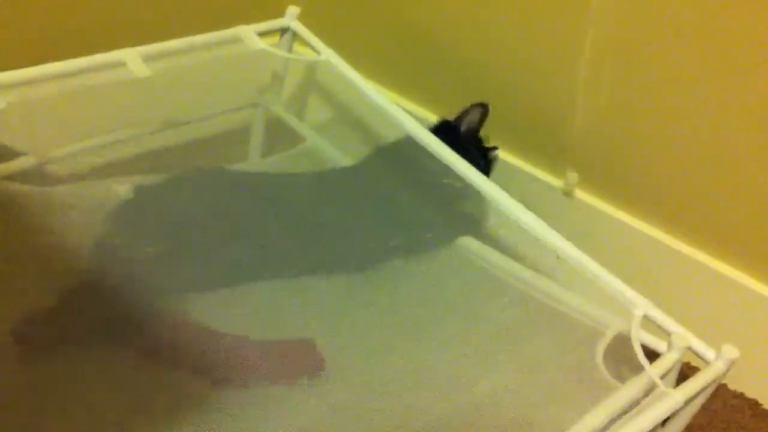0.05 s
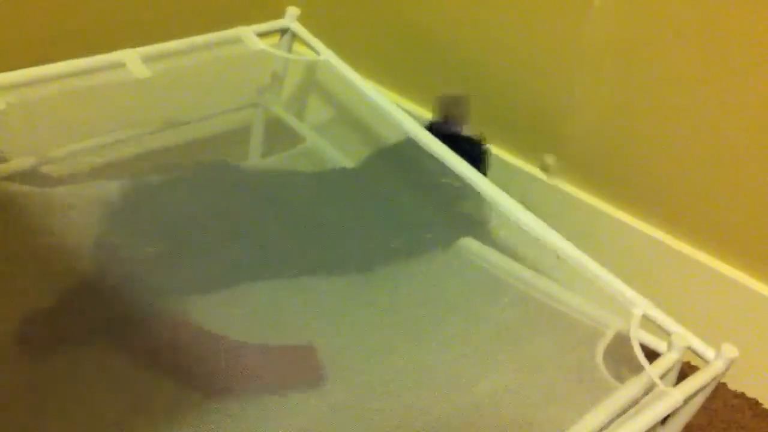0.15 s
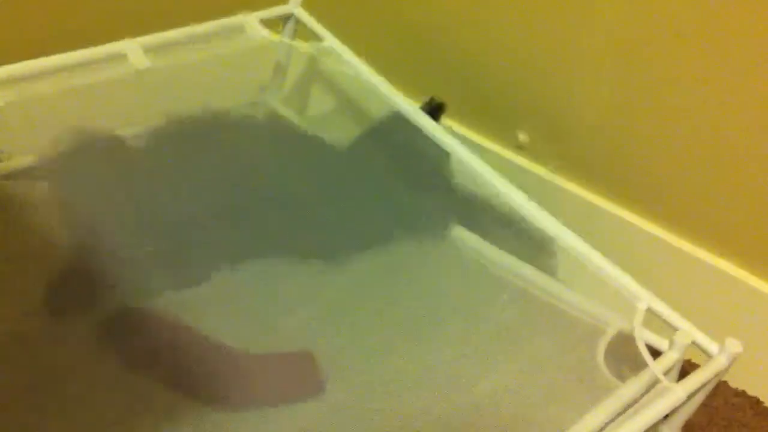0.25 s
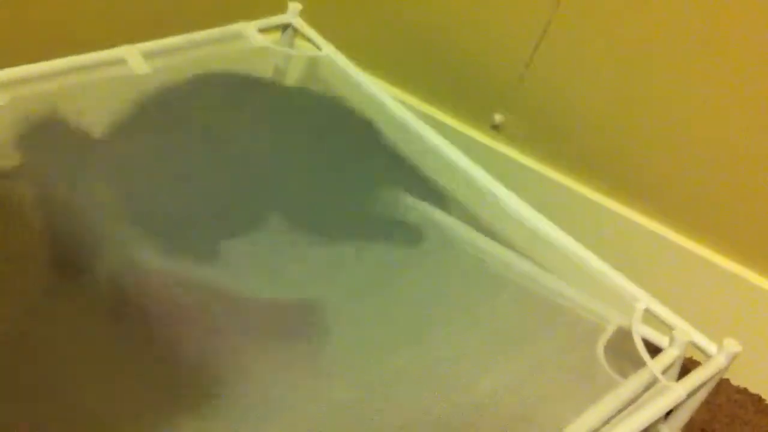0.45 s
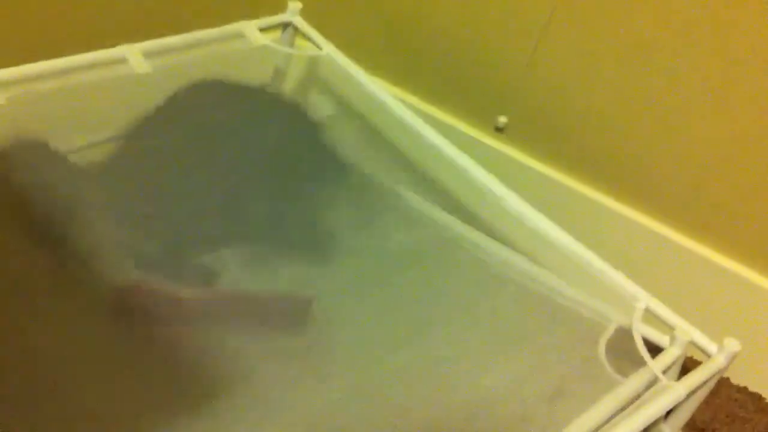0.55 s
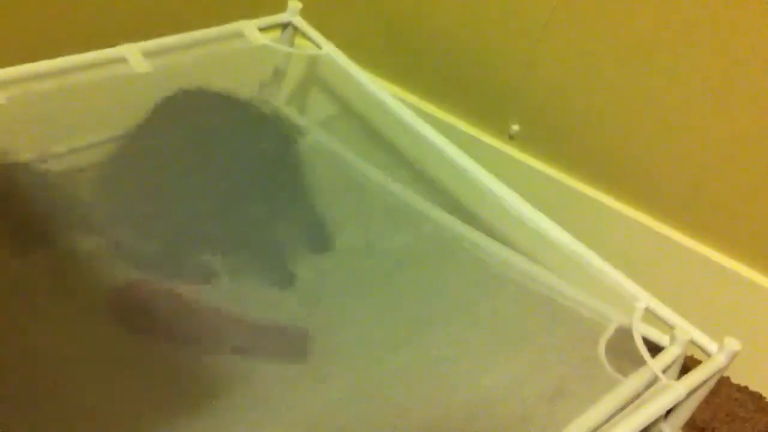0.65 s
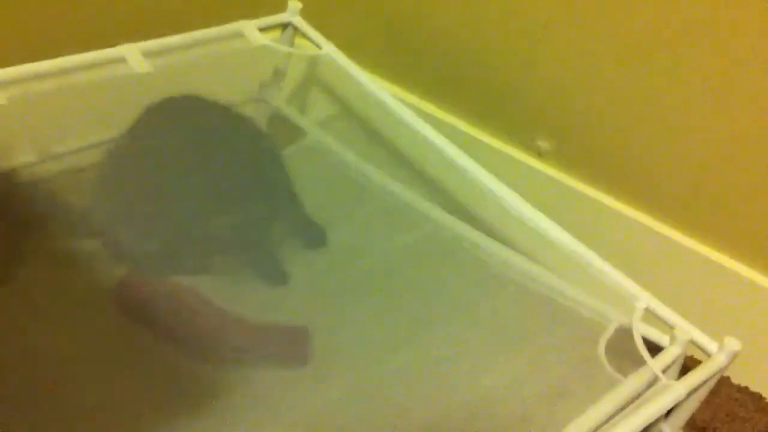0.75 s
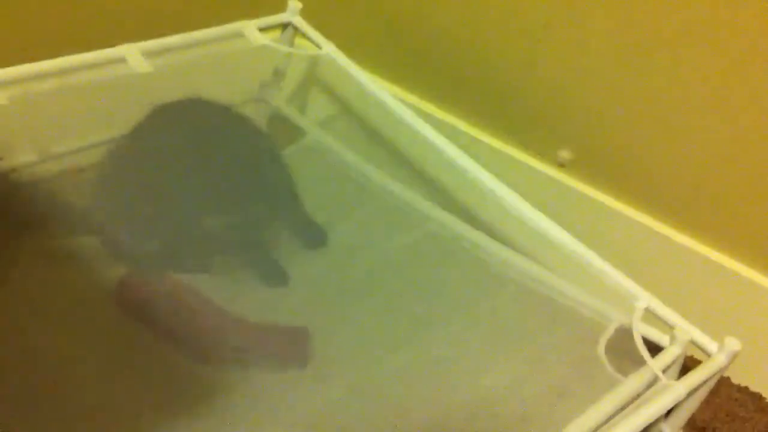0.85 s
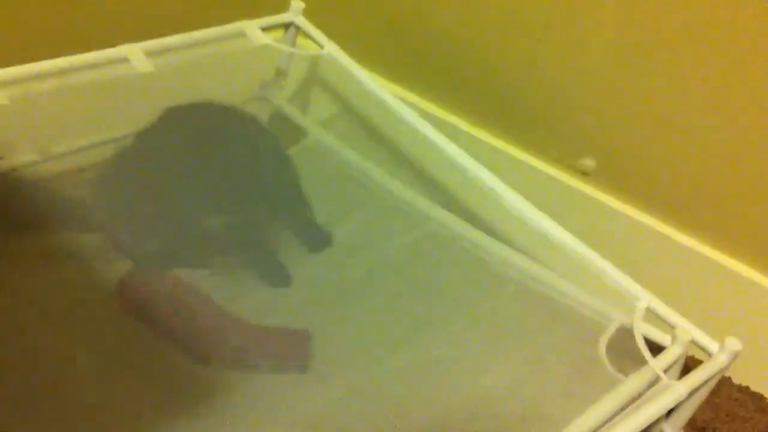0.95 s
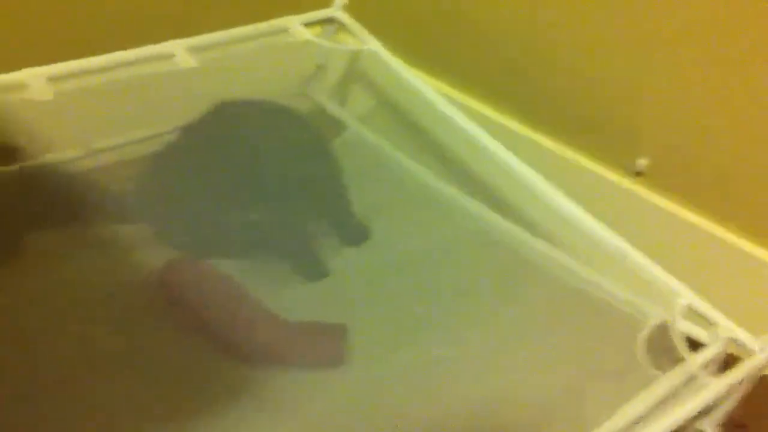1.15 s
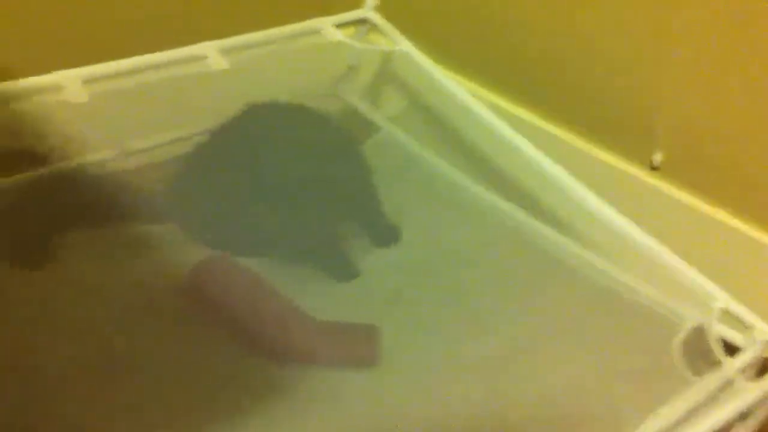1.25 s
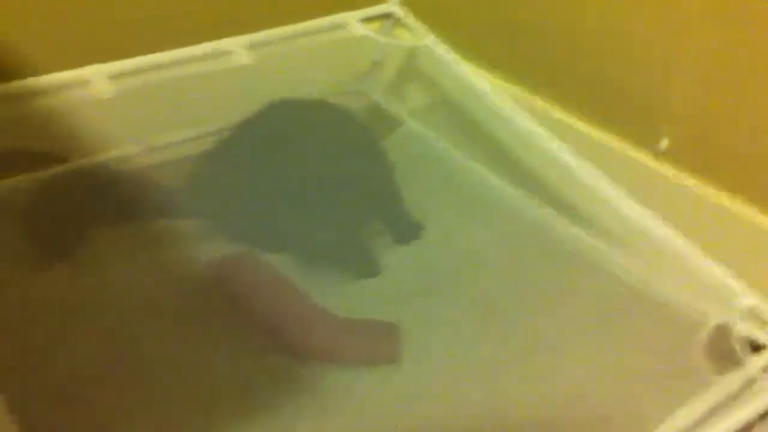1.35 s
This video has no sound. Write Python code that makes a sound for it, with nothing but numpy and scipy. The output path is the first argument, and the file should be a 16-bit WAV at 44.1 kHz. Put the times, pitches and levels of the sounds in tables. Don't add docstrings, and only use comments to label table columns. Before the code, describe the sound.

Sharp plastic knocks from a drying rack jostled by a kitten, building to one hard, briefly ringing crack, then sparse light ticks and soft handling bumps; small room, close hand-held microphone, steady faint hiss.

```python
import sys
import numpy as np
from scipy import signal
from scipy.fft import rfft, irfft
from scipy.io import wavfile
from scipy.ndimage import uniform_filter1d

SR = 44100
rng = np.random.default_rng(int(sys.argv[2]) if len(sys.argv) > 2 else 0)


def wav_record(signal):
    frames = np.transpose(np.atleast_2d(signal))
    bounded = np.clip(frames, -1, 1)
    quanta = np.round(bounded * 32767).astype(np.int16)
    wavfile.write(sys.argv[1], SR, quanta)


def volts_from_decibels(level):
    exponent = np.asarray(level, float) / 20
    return 10 ** exponent


N = 61739

# t/s, peak level/dB, lowest f/Hz, highest f/Hz,
# chatter length/ms
JOINT_TICKS = [(0.1985, -48, 4970, 8000, 2.4), (0.1985, -49, 595, 3100, 2.2), (.2132, -42, 500, 1500, 1.2),
               (0.2137, -41, 1600, 4200, 1.2), (0.3055, -39, 1500, 13600, 5), (.3107, -32, 3500, 9000, .8),
               (0.3105, -40, 6560, 14600, 2.5), (.311, -29, 1500, 5000, 3.2), (0.4016, -49, 500, 1800, 4),
               (0.3983, -44, 1290, 3900, 1.7), (0.4387, -48.5, 980, 5900, 11), (0.4445, -32, 700, 11400, 2),
               (.4558, -21, 3000, 6300, 2), (.4558, -25, 1500, 3600, 1.8), (0.455, -30, 6000, 14300, 2.7),
               (0.4579, -42, 600, 1300, 6), (0.4642, -28, 3900, 5200, 2.5), (0.4685, -33, 3800, 5200, 2.5),
               (.4745, -36, 2600, 5600, 3.5),
               (.042, -51, 2180, 12700, 13), (.153, -52, 500, 3300, 1.1), (.282, -45, 590, 2400, 3.3),
         (0.2861, -49.5, 4000, 7500, 2.5), (0.292, -63, 2000, 5500, 2), (0.374, -48, 1500, 8900, 2.8),
         (.384, -42, 1500, 3960, 3.3), (.611, -55, 590, 4000, 2.6), (0.7011, -43, 500, 2750, 3.4),
         (0.7122, -46.5, 690, 4500, 3), (.720, -51, 400, 3200, 5.4), (.835, -53.5, 590, 3520, 4.1),
         (0.877, -40, 2470, 14000, 2.16), (.8775, -48.5, 500, 2520, 1.4), (0.8893, -50, 2000, 6000, 1.05),
         (0.894, -43.5, 1690, 4180, 4.5), (0.949, -43.5, 1190, 4380, 3.5), (1.059, -51, 1500, 3100, 2.4),
         (1.058, -50.5, 694, 5800, 3.6), (1.296, -50.5, 990, 3400, 3), (1.297, -51, 5080, 5760, 2.2),
         (1.306, -55.5, 1000, 2950, 4.7), (1.3378, -50.5, 607, 4470, 1.5), (1.35, -51, 1430, 3280, 4.4),
         (.3155, -40.5, 790, 4130, 10), (.448, -43.5, 1500, 4000, 2.6)]
# t/s, peak level/dB, f/Hz, t60/ms
PINGS = [(.1535, -55, 1500, 8), (.1535, -51, 1020, 8.3), (.2135, -42.5, 835, 17),
         (.2135, -38.5, 1103, 15.5), (.2134, -45.5, 2060, 15), (.2136, -47, 3030, 20),
         (0.31, -32.5, 5700, 8.2), (.3122, -33, 4000, 10), (.311, -36, 3350, 6.7), (0.63, -51, 1500, 8),
         (.7125, -49, 3650, 6), (.7012, -51.5, 810, 11), (.489, -45, 5400, 8.6), (.4985, -51, 3660, 8),
         (0.55, -45, 5000, 8), (.345, -48, 2830, 10), (0.3, -47, 3000, 10), (.3112, -39, 2036, 14),
         (.3126, -28.5, 2780, 6.4), (.319, -49, 2000, 11), (.3335, -42, 1870, 17), (.339, -48, 4300, 13),
         (0.4, -42, 940, 20), (.3985, -33, 1510, 4.1), (.3996, -31.5, 1480, 3.5), (.3986, -46, 2100, 16),
         (.413, -47, 1900, 10), (.445, -34, 4700, 8.8), (0.46, -22, 4500, 14), (.4598, -31, 2950, 7),
         (0.41, -41, 2600, 6), (0.46, -52, 4400, 5.4), (.4562, -33, 1860, 14), (.457, -41, 920, 26),
         (.476, -44, 5400, 8), (.949, -51.5, 3800, 8.6), (1.0575, -48.5, 2660, 13), (1.0575, -58, 1700, 19),
         (1.0575, -56, 2350, 20), (1.0575, -59, 1120, 22), (1.2965, -52, 2250, 16), (1.2965, -57, 1700, 18)]
# t/s, peak level/dB, f/Hz, t60/s, swell/cycles
THUMPS = [(0.1517, -36, 309, 0.036, 1.06), (0.1685, -34, 188, 0.042, 0.73), (0.193, -44.5, 230, 0.043, .6),
          (0.2007, -33, 220.7, 0.087, 0.74), (.201, -43, 335, .08, 0.41), (0.2284, -41, 336, 0.076, 1.2),
          (0.2323, -41, 194, 0.1, 1.1), (.266, -45, 260, 0.047, 0.65), (0.282, -49, 345, 0.052, 0.29),
          (0.4027, -35, 297, 0.032, 0.65), (0.4026, -42.5, 202, 0.036, 0.68), (0.417, -37, 260, 0.038, 1),
          (.4501, -31, 338, 0.042, 0.91), (0.4576, -23.5, 215, 0.095, 0.73),
          (0.4582, -33.5, 340, 0.091, 0.51), (0.456, -43, 136, 0.093, 0.45), (.462, -46, 453, 0.086, 0.21),
          (.458, -47, 634, 0.13, 0.45), (0.4826, -31.5, 340, 0.067, 0.93), (0.4943, -34.5, 192, 0.067, 0.4),
          (.520, -42, 258, 0.072, 0.8), (.525, -48, 176, .06, .8), (0.541, -46, 312, 0.04, 0.52),
          (.55, -51, 237, 0.056, 0.51), (0.574, -42, 212, 0.056, 0.4), (0.601, -46.5, 235, 0.048, 0.45),
          (.703, -57, 280, 0.053, .8), (0.877, -53.5, 309, 0.065, 0.58), (.915, -59, 178, 0.14, .8),
          (1.059, -59.5, 305, 0.09, 0.65)]
# t/s, level/dB
ROD_HITS = [
    (0.4571, -59),
    (0.4652, -66),
    (0.47, -68),
    (0.477, -73),
    (0.483, -73),
    (0.4951, -74),
    (.504, -71),
    (0.513, -67),
]
# t/s, level/dB
LOAD = [(0, -67), (0.061, -67), (.09, -72), (.14, -63.5), (.22, -63.5), (.3, -59.5), (.44, -56), (.55, -62),
        (.75, -68.5), (1.15, -82), (1.4, -72)]
# f/Hz, level/dB
MESH_SPECTRUM = [(300, 1.5), (1000, -5), (2500, -5.5), (5000, -7.5), (10000, -15), (15000, -22.5)]
# t/s, peak level/dB, start f/Hz
BUMPS = [(1.156, -62, 710), (1.185, -51, 560), (1.1983, -53, 695), (1.216, -45, 298), (1.234, -48, 354),
         (1.256, -53.5, 620), (1.269, -48, 316), (1.309, -48.5, 347), (1.326, -54, 465),
         (1.3394, -39.5, 266), (1.361, -54.5, 249)]
# f/Hz, level/dB
HISS_SPECTRUM = [(24, -43), (40, -10), (60, -5), (312, -2), (810, -7), (2770, -13), (3220, -11.5),
                 (14800, -15), (16000, -12)]

CHATTER_PER_S, TICK_FADE, GRIT = 4000, 0.69, 0.73
ROD_COUNT, ROD_HZ, ROD_SPREAD_OCT, ROD_T60_S, ROD_SKIRT_DB = 90, 4706, 0.22, 0.2, -9.5
ROOM_T60_S, ROOM_TOP_T60_S, WALL_CUT_HZ = 0.27, 0.14, 4000
CORNER_T60_S, CORNER_DB = 0.03, 6.5
ROOM_DB, ROOM_PING_DB, ROOM_LOW_DB = -6.5, -3.5, -18
CRACKLES_PER_S, CRACKLE_SPREAD_DB, FIBRE_NOISE = 2500, 4, 0.47
BUMP_FALL, BUMP_CYCLES = 0.64, 0.46
HISS_DB = -66
MIC_CUT_HZ, MIC_TOP_HZ, MIC_CLIP = 130.5, 15700, 0.14


def ticks():
    out, t = np.zeros(N), np.arange(1024) / SR
    contacts = JOINT_TICKS
    draws = rng.random((len(contacts), 1024))
    sizes = rng.standard_normal((len(contacts), 1024))
    for (s, db, low_hz, top_hz, ms), draw, size in zip(contacts, draws, sizes):
        length_s = ms / 1000
        gate = (t < length_s) * np.exp(-TICK_FADE * t / length_s) * np.minimum(t * 5000, 1)
        slips = draw < CHATTER_PER_S / SR
        spectrum = rfft(gate * np.tanh(size * (GRIT + slips)))
        power = uniform_filter1d(np.abs(spectrum) ** 2, size=13)
        even = irfft(spectrum / np.sqrt(power + 1e-9)) * (t < 2 * length_s)
        band = signal.butter(3, [low_hz, top_hz], "band", fs=SR, output="sos")
        body = signal.sosfilt(band, even)
        add(out, s, volts_from_decibels(db) * body / np.abs(body).max())
    return out


def pings():
    out, t = np.zeros(N), np.arange(2048) / SR
    for s, db, hz, ms in PINGS:
        decay = volts_from_decibels(db - 60 * t * 1000 / ms)
        add(out, s, decay * np.sin(2 * np.pi * hz * t))
    return out


def thumps():
    out, t = np.zeros(N), np.arange(SR // 2) / SR
    for s, db, hz, t60_s, swell_cycles in THUMPS:
        rise = np.sin(np.pi / 2 * np.minimum(t * hz / swell_cycles, 1)) ** 2
        decay = volts_from_decibels(db - 60 * t / t60_s)
        add(out, s, decay * rise * np.sin(2 * np.pi * hz * t))
    return out


def rods():
    out, (s, db) = np.zeros(N), np.transpose(ROD_HITS)
    offsets = np.linspace(-1, 1, ROD_COUNT) + rng.normal(0, .008, ROD_COUNT)
    polarities = rng.choice([-1, 1], (ROD_COUNT, len(s)))
    lives = rng.uniform(.7, 1.3, ROD_COUNT)
    for offset, signs, life in zip(offsets, polarities, lives):
        clicks = np.zeros(N)
        clicks[(s * SR).astype(int)] = volts_from_decibels(db) * signs
        core = np.exp(-.5 * (offset / ROD_SPREAD_OCT) ** 2)
        skirt = volts_from_decibels(ROD_SKIRT_DB) * (1 - offset ** 2)
        out += (core + skirt) * ring(clicks, ROD_HZ * 2 ** (.7 * offset), ROD_T60_S * life)
    return out


def room(x):
    t = np.arange(SR // 2) / SR
    tail_noise, corner_noise = rng.standard_normal((2, SR // 2))
    low = signal.sosfilt(signal.butter(1, WALL_CUT_HZ, fs=SR, output="sos"), tail_noise)
    tail = low * volts_from_decibels(-60 * t / ROOM_T60_S) + (tail_noise - low) * volts_from_decibels(-60 * t / ROOM_TOP_T60_S)
    corner = corner_noise * volts_from_decibels(CORNER_DB - 60 * t / CORNER_T60_S)
    onset = np.clip((t - .0015) / 0.0022, 0, 1)
    echo = (tail + corner) * onset
    return signal.fftconvolve(x, echo / np.sqrt(np.sum(echo ** 2)))[:N]


def mesh():
    sizes_db = CRACKLE_SPREAD_DB * np.minimum(rng.exponential(1, N), 4)
    sizes = volts_from_decibels(sizes_db) * rng.choice([-1, 1], N)
    crackles = sizes * (rng.random(N) < CRACKLES_PER_S / SR)
    grains = crackles + FIBRE_NOISE * rng.standard_normal(N)
    s, db = np.transpose(LOAD)
    return volts_from_decibels(np.interp(np.arange(N) / SR, s, db)) * coloured(grains, MESH_SPECTRUM)


def bumps():
    out, t = np.zeros(N), np.arange(2000) / SR
    slowing = 1 - BUMP_FALL
    for s, db, hz in BUMPS:
        turns = ((1 + t * hz * 2) ** slowing - 1) / (2 * slowing)
        fade = np.exp(-(turns / BUMP_CYCLES) ** 2)
        add(out, s, volts_from_decibels(db + 3) * np.sin(2 * np.pi * turns) * fade)
    return out


def hiss():
    return volts_from_decibels(HISS_DB) * coloured(rng.standard_normal(N), HISS_SPECTRUM)


def coloured(x, points):
    hz, db = np.transpose(points)
    f = np.maximum(np.fft.rfftfreq(N, 1 / SR), 10)
    y = irfft(rfft(x) * volts_from_decibels(np.interp(np.log(f), np.log(hz), db)), N)
    return y / np.sqrt(np.mean(y ** 2))


def ring(x, hz, t60_s):
    r, w = volts_from_decibels(-60 / (t60_s * SR)), 2 * np.pi * hz / SR
    return signal.lfilter([0, np.sin(w)], [1, -2 * r * np.cos(w), r * r], x + 1e-18)


def add(out, s, sound):
    i = int(s * SR)
    out[i:i + len(sound)] += sound[:len(out) - i]


def scene():
    sharp, notes, low = ticks(), pings(), thumps()
    wet = room(volts_from_decibels(ROOM_DB) * (sharp + volts_from_decibels(ROOM_PING_DB) * notes) + volts_from_decibels(ROOM_LOW_DB) * low)
    rack = sharp + notes + low + rods() + mesh()
    return (rack + wet + bumps() + hiss())[None]


def roll_off(x):
    return signal.sosfilt(signal.butter(12, 16290, fs=SR, output="sos"), x)


def record(dry):
    bass_cut = signal.butter(3, MIC_CUT_HZ, "high", fs=SR, output="sos")
    top_cut = signal.cheby1(12, .5, MIC_TOP_HZ, fs=SR, output="sos")
    x = signal.sosfilt(bass_cut, dry)
    x = MIC_CLIP * np.tanh(x / MIC_CLIP)
    x = signal.sosfilt(top_cut, x)
    return roll_off(x)


dry = scene()
out = record(dry)
wav_record(out)
```